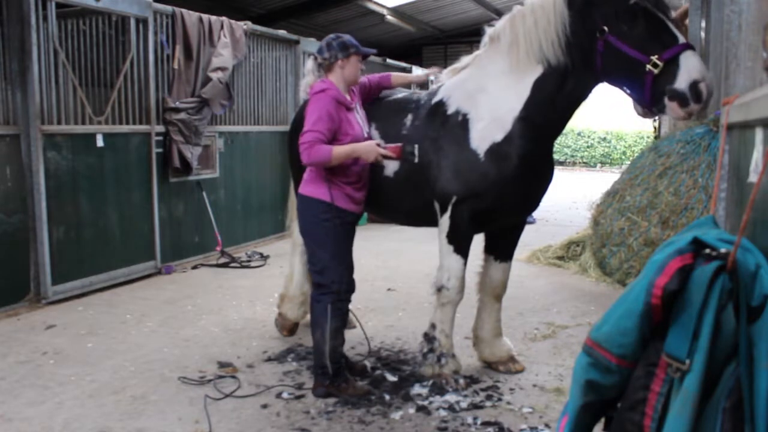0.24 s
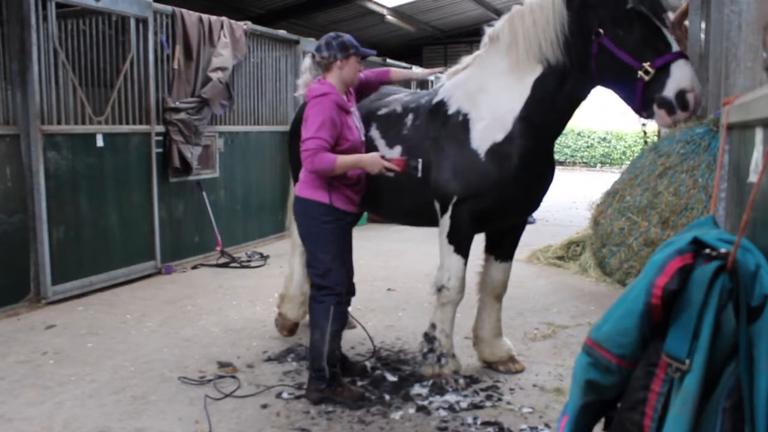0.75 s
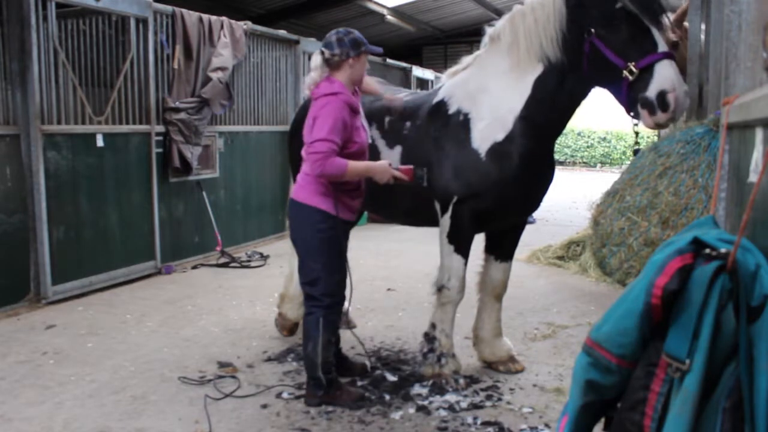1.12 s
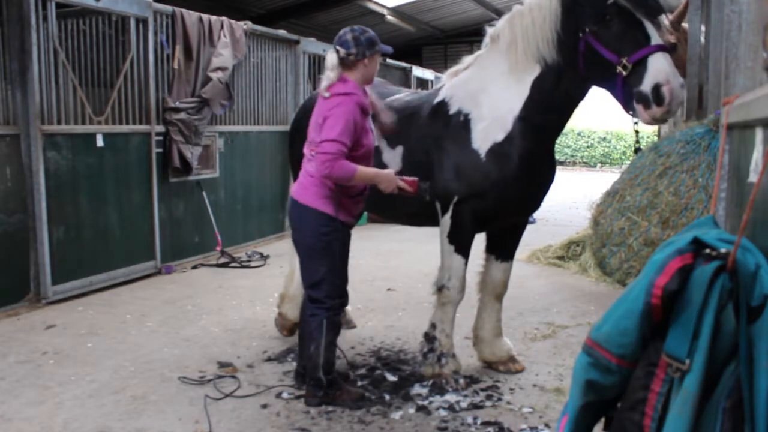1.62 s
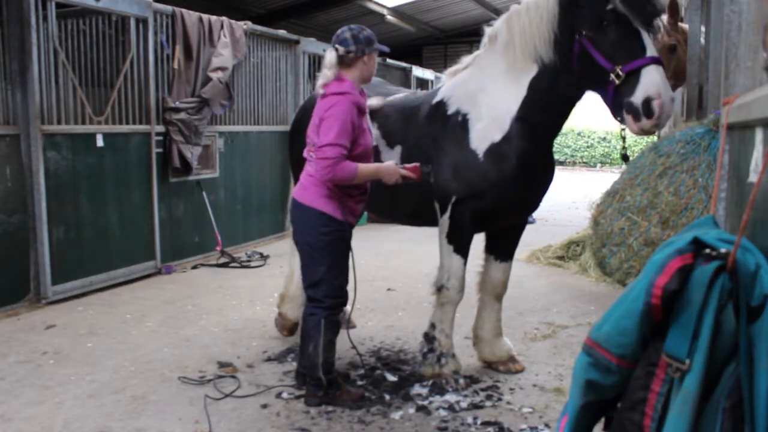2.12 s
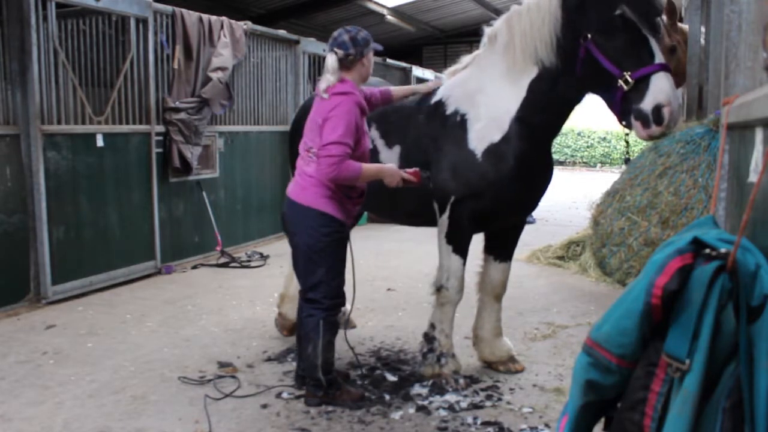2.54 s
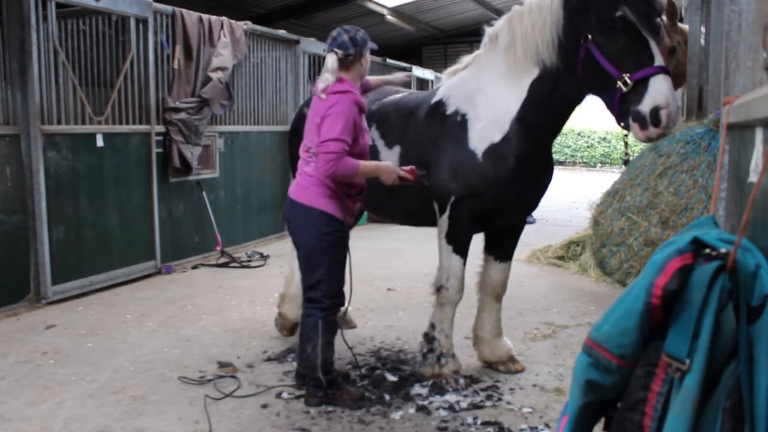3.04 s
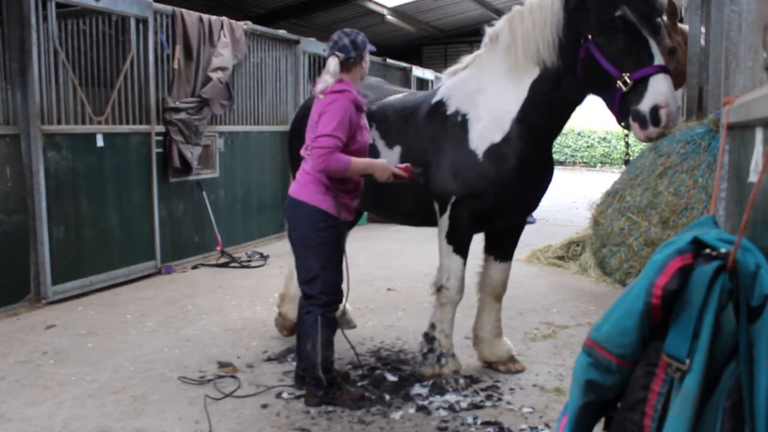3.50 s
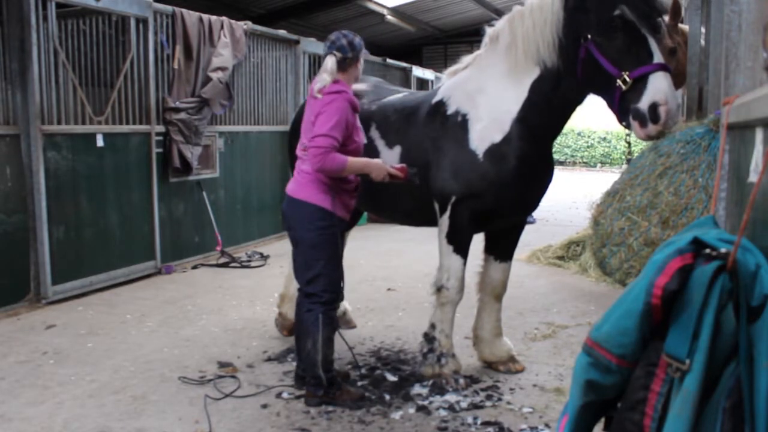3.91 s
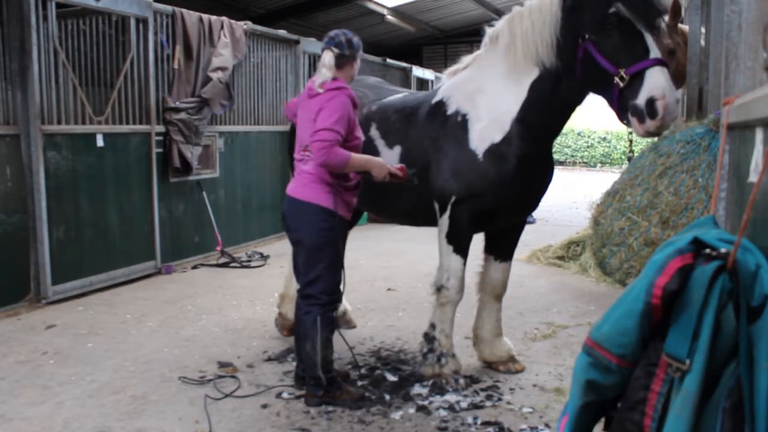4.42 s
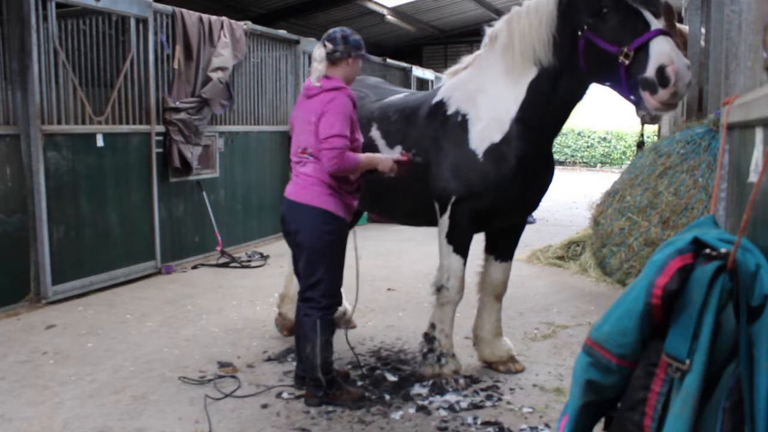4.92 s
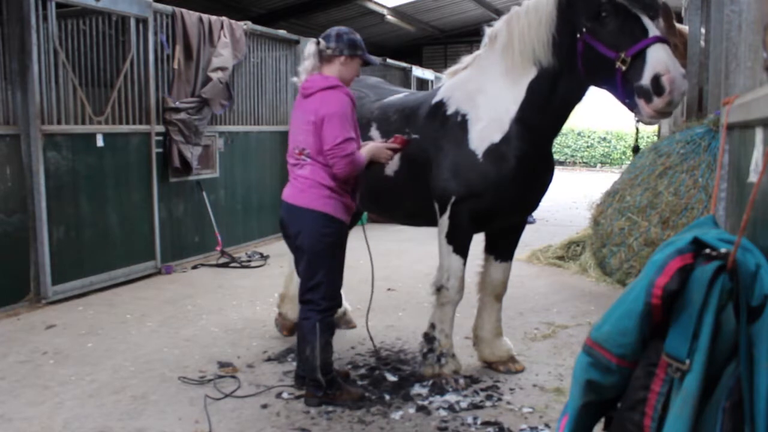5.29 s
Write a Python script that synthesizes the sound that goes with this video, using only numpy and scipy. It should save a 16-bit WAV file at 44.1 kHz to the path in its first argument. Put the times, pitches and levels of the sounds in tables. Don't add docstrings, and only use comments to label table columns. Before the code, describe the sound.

A steady, bright clipper buzz with chattering steel teeth and a thin motor whine wavers slightly as the hand turns in a stable.

```python
import sys
import numpy as np
from scipy import signal
from scipy.io import wavfile
from scipy.ndimage import uniform_filter1d, minimum_filter1d

SR = 44100
rng = np.random.default_rng(int(sys.argv[2]) if len(sys.argv) > 2 else 0)


def dump_mix(stems):
    frames = np.atleast_2d(stems).T
    limited = np.clip(frames, -1, 1)
    pcm = np.round(limited * 32767).astype(np.int16)
    wavfile.write(sys.argv[1], SR, pcm)


def invert_db(level):
    return 10 ** (np.asarray(level, dtype=float) / 20)


N = 244742
TIME = np.arange(N) / SR

# start_s, level_db
LEVEL = [(0.0, -26.5), (0.31, -21.5), (0.91, -22), (1.07, -24), (1.17, -20), (1.39, -22), (2.26, -22),
         (2.32, -24), (2.72, -21.5), (2.87, -22.5), (3.72, -21.5), (3.92, -23), (4.31, -20.5),
         (4.33, -23.5), (4.62, -20), (4.7, -21.5), (5.38, -22.5), (5.55, -26.5)]


def evened(x):
    return x / np.sqrt(np.mean(x ** 2) + 1e-20)


def curves(rows):
    s, *columns = np.transpose(rows)
    return [np.interp(TIME, s, column) for column in columns]


def read(points, hz):
    table_hz, value = np.transpose(points)
    return np.interp(np.log(hz + 1), np.log(table_hz + 1), value)


def coloured(x, points):
    hz = np.abs(np.fft.fftfreq(4096, 1 / SR))
    log_gain = np.log(invert_db(read(points, hz)))
    spectrum = np.exp(np.conj(signal.hilbert(log_gain)))
    taps = np.fft.ifft(spectrum).real[:2048]
    return signal.oaconvolve(x, taps)[:N]


def resonate(x, hz, width_hz):
    return signal.lfilter(*signal.iirpeak(hz, hz / width_hz, SR), x)


def band(x, lo_hz, hi_hz):
    sos = signal.butter(2, [lo_hz, hi_hz], "band", fs=SR, output="sos")
    return signal.sosfiltfilt(sos, x)


def drift(shape, size):
    if shape == N:
        coarse = N // 16 + 2
        return np.interp(np.arange(N) / 16, np.arange(coarse), drift(coarse, size // 16))
    once = uniform_filter1d(rng.standard_normal(shape), size, 0)
    return evened(uniform_filter1d(once, size, 0))


def bump(s, length_s):
    return .5 ** (((TIME - s) / (length_s / 2)) ** 2)


def posed(values):
    # start_s, pose
    pose_times = [
        (0, 0),
        (.95, 0.16),
        (1.25, 0.94),
        (3.4, 1.26),
        (4.55, 1.5),
        (5.05, 2.4),
        (5.55, 1.7),
    ]
    return np.interp(curves(pose_times)[0], range(3), values)


def facing():
    # start_s (the middle), length_s, plate_db, comb_plate_db, top_db
    wrist_turns = [(0.017, 0.067, 10.5, -0.5, 3), (0.527, 0.48, 1, -2.5, -0.5), (1.007, 0.27, 6, -1, 1),
                   (1.552, 0.21, 3, -3.5, 0), (2.455, .25, -.5, 2.5, 0), (3.007, 0.091, -1, 0, -2),
                   (3.184, 0.19, 1, -0.5, 0), (3.647, 0.24, 0.5, 0, -1.5), (4.596, 0.79, 2, -3, -2),
                   (4.925, 0.13, 2, 1, 0.5), (5.55, 0.097, 6, 2.5, 3.5)]
    # low_db, flank_db, raised_db
    top_pose = (0, -0.4, 1.9)
    # low_db, flank_db, raised_db
    comb_pose = (1.4, -.6, -.4)
    plate_db, comb_db, top_db = sum(np.outer(db, bump(s, length_s)) for s, length_s, *db in wrist_turns)
    return curves(LEVEL)[0], plate_db, top_db + posed(top_pose), comb_db + posed(comb_pose)


def crank():
    start_turns, warm_hz, gap_hz, warm_up_s = -0.2003, 38.7381, 0.184, 2.0
    lag_turns = gap_hz * warm_up_s * (1 - np.exp(-TIME / warm_up_s))
    return start_turns + warm_hz * TIME - lag_turns


def brush_whistle():
    # start_s (the middle), length_s, level_db
    vent_swings = [(0.113, .1, -36), (0.448, .15, -36), (.78, 0.38, -34.5), (1.09, .1, -36),
                   (1.28, .12, -39), (1.8, 0.11, -34), (2.0, .1, -46), (2.21, 0.16, -37),
                   (3.018, .3, -31.5), (3.31, 0.083, -38), (3.613, 0.16, -50), (4.02, .15, -51),
                   (4.3, .12, -43), (4.603, .2, -42), (4.86, 0.21, -39), (5.17, .25, -37),
                   (5.512, .08, -36)]
    faint = invert_db(-46)
    swings = sum(invert_db(db) * bump(s, length_s) for s, length_s, db in vent_swings)
    return (faint + swings) * invert_db(1.5 * drift(N, size=400))


def motor():
    # low_db, flank_db, raised_db
    shaft_pose = (-47.5, -56, -50)
    # pitch_per_shaft_turn, level_db
    further_tones = [(.947, -62), (1.895, -57), (2, -54), (3, -50), (9, -44), (12, -44)]
    gear = 11.177
    turn = 2 * np.pi * gear * crank()
    out = invert_db(posed(shaft_pose)) * np.sin(turn)
    out += brush_whistle() * np.sin(18 * turn + .3 * drift(N, size=900))
    for order, db in further_tones:
        level = invert_db(db + 0.5 + 1.0 * drift(N, size=5000))
        out += level * np.sin(order * turn + 1.5 * drift(N, size=4000))
    return np.sqrt(2) * out


def stroke(angle, depth_db, sharp):
    return invert_db(depth_db * (abs(np.cos(2 * np.pi * angle)) ** sharp - 1))


def clicks(angles, sizes, jitter_s, wander_s):
    turns = np.arange(-2, len(sizes) - 2)[:, None]
    s = np.interp(turns + angles, crank(), TIME, left=-1, right=-1)
    s = s + jitter_s * rng.standard_normal(sizes.shape) + wander_s * drift(sizes.shape, size=20)
    at = np.round(s * SR).astype(int)
    inside = (at >= 0) & (at < N)
    return np.bincount(at[inside], sizes[inside], N)


def knocks(count=220):
    # angle_turns, level_db
    turn_knocks = [(.396, -15), (.449, -5), (.488, 0), (.499, -3), (.512, -7), (.537, -6), (.602, -15),
                   (.872, -16), (.896, -14), (.951, -12), (.989, -2), (1.002, -5), (1.026, -6), (1.05, -11)]
    angle, db = np.transpose(turn_knocks)
    shape = (count, len(db))
    chance_db = 2.0 * drift(shape, size=12) + 2.0 * rng.standard_normal(shape)
    size = invert_db(db + np.minimum(chance_db, 4.5))
    push = np.where(angle > .7, -1, 1)
    return evened(clicks(angle, size * push, jitter_s=2.5e-5, wander_s=6e-5))


def chatter(count=220, order=150):
    half = (np.arange(order) + rng.random(order)) / order / 2
    angle = np.r_[half, half + .5]
    pattern = 0.23 * rng.standard_normal(order) + 0.71 * drift((count, order), size=10)
    size = np.c_[pattern, -pattern] + 0.69 * drift((count, 2 * order), size=8)
    size = size * stroke(angle, depth_db=9.3, sharp=1.8)
    return evened(clicks(angle, size, jitter_s=2.2e-5, wander_s=3e-5))


def scrape():
    swell = stroke(crank() + 0.0028, depth_db=6.3, sharp=1.0)
    flare = stroke(crank() - .004, depth_db=3.6, sharp=5.2)
    return evened(rng.standard_normal(N) * swell * flare * invert_db(0.83 * drift(N, size=150)))


def aisle(x, count=3):
    # pitch_hz, fade_s
    echo_fade = [
        (300, 0.99),
        (1000, 0.75),
        (3000, 1),
        (8000, 0.037),
    ]
    out = np.zeros(N)
    for k in range(count):
        taps = np.zeros(SR // 2)
        at = np.arange(200, len(taps) - 20, 20)
        taps[at + rng.integers(0, 20, len(at))] = rng.choice([-1., 1.], len(at))
        hz, t, z = signal.stft(taps, SR, nperseg=256)
        fade = invert_db(-60 * t / read(echo_fade, hz)[:, None])
        tail = signal.istft(z * fade, SR, nperseg=256)[1]
        share = np.sqrt(2 / count) * np.cos(np.pi * (0.49 * TIME + k / count))
        out += signal.fftconvolve(x * share, tail / np.linalg.norm(tail))[:N]
    return out


def blade():
    # pitch_hz, level_db
    knock_colour = [(150, -89), (500, -55), (950, -34), (1200, -20.5), (1800, -11.5), (2200, -6.5),
                    (2600, -7), (3300, -8.5), (4400, -3), (5200, -2.5), (6000, -1.5), (8500, -11.5),
                    (11000, -27.5), (16000, -83.5)]
    # pitch_hz, level_db
    scrape_colour = [(150, -38), (300, -28.5), (600, -14.5), (1200, -9.5), (2150, -7), (2600, -8.5),
                     (3000, -1.5), (4600, -5.5), (6200, -10.5), (8000, -4.5), (10000, -34), (12500, -28.5),
                     (14800, -44), (16000, -77)]
    # pitch_hz, width_hz, level_db
    plate_rings = [
        (2534, 100, 3.5),
        (3256, 82, -4.5),
        (4390, 180, -11),
        (5730, 75, -14),
        (9240, 82, -2.5),
    ]
    hits = evened(coloured(invert_db(-1.5) * knocks() + invert_db(2.5) * chatter(), knock_colour))
    sliding = evened(coloured(scrape(), scrape_colour))
    drive = invert_db(4.5) * hits + invert_db(-1.0) * sliding
    rung = drive.copy()
    for hz, width_hz, db in plate_rings:
        rung += invert_db(db + 1.1 * drift(N, size=6000)) * resonate(drive, hz, width_hz)
    heard = rung + invert_db(-12.0) * aisle(rung)
    level_db, plate_db, top_db, comb_db = facing()
    out = heard / band(heard, 2730, 7070).std()
    for db, lo_hz, hi_hz in ((plate_db, 2250, 2950), (top_db, 6500, 14000), (comb_db, 3100, 3600)):
        out = out + band(out, lo_hz, hi_hz) * (invert_db(db - db.mean()) - 1)
    return invert_db(level_db - 0.6) * out


def hum():
    # pitch_per_crank_turn, low_db,
    # flank_db, raised_db
    crank_tones = [(7, -61, -66, -69), (8, -64, -69, -69), (9, -58, -61, -64), (10, -62, -59, -58),
                   (11, -58, -63, -57), (12, -66, -60, -62), (13, -56, -58, -50), (14, -54, -53, -60),
                   (15, -57, -47, -51), (16, -56, -52, -50), (17, -44, -44, -48), (18, -58, -55, -52),
                   (19, -43, -49, -48), (20, -51, -55, -55), (21, -46, -55, -46), (22, -49, -49, -52),
                   (23, -43, -50, -48), (24, -51, -47, -49), (25, -44, -54, -55), (26, -52, -53, -59),
                   (27, -55, -62, -54), (28, -53, -52, -61), (29, -53, -55, -62), (30, -45, -48, -51),
                   (31, -52, -58, -54), (32, -49, -52, -51), (34, -54, -51, -49), (45, -48, -43, -43),
                   (53, -44, -44, -52),
                   (35, -56, -56, -59), (36, -56, -50, -51), (37, -48, -52, -53), (38, -46, -58, -48),
                   (39, -49, -48, -48), (43, -43, -50, -46), (47, -50, -54, -48), (48, -45, -49, -49),
                   (49, -41, -47, -49), (51, -47, -47, -47), (55, -42, -50, -51), (57, -41, -50, -44),
                   (60, -40, -42, -41), (61, -42, -47, -45), (63, -40, -45, -40), (65, -41, -40, -39),
                   (67, -36, -36, -37), (69, -37, -35, -40), (71, -37, -41, -40), (73, -44, -41, -41),
                   (85, -39, -43, -46), (87, -38, -41, -43), (89, -38, -45, -44)]
    out, angle = np.zeros(N), crank()
    blade_db, plate_db = facing()[:2]
    facing_db = blade_db + plate_db
    swing_db = 0.24 * (facing_db - np.mean(facing_db)) - 0.5
    for order, *db in crank_tones:
        plate = order > 54
        level_db = posed(db) + 1.13 * drift(N, size=5000)
        start = .15 * rng.random() - order * .535 if plate else rng.random()
        phase = 2 * np.pi * (order * angle + start) + 0.39 * drift(N, size=6000)
        out += invert_db(level_db + plate * swing_db) * np.sin(phase)
    return invert_db(2.5) * out


def snap(count=220):
    # pitch_hz, level_db
    tick_colour = [(150, -80), (5000, -27), (8500, -9), (10500, 0), (13000, -8), (16000, -22)]
    size = invert_db(3.0 * np.minimum(rng.exponential(1, (count, 2)), 3))
    ticks = clicks(np.array([.493, .993]), size, jitter_s=0.00015, wander_s=1e-4)
    return invert_db(curves(LEVEL)[0] - 35) * evened(coloured(ticks, tick_colour))


def stable_air():
    # pitch_hz, level_db
    air_colour = [(15, -21), (25, -27), (59, -11.5), (107, -4.5), (221, -4.5), (296, -4.5), (330, -14),
                  (430, -18), (730, -120)]
    air = evened(coloured(rng.standard_normal(N), air_colour))
    far_hum = evened(resonate(rng.standard_normal(N), 63, 2.5))
    out = invert_db(-65 + 2.0 * drift(N, size=2500)) * air
    return out + invert_db(-73 + 2.0 * drift(N, size=9000)) * far_hum


def hooves():
    # start_s, level_db (peak), pitch_hz, fade_s (to fall 60 dB)
    hoof_shifts = [(0.052, -53, 120, 0.13), (.74, -69, 120, .15), (.97, -55, 100, 0.11),
                   (1.5, -51, 120, 0.2), (1.92, -48, 250, 0.12), (2.5, -49, 120, 0.1),
                   (3.38, -49, 230, 0.24), (4.22, -55, 111, 0.42), (4.578, -46, 225, 0.074),
                   (4.64, -32.5, 750, 0.48), (4.69, -49, 70, 0.12)]
    out = np.zeros(N)
    for s, db, hz, fade_s in hoof_shifts:
        age = np.maximum(TIME - s, 0)
        thud = evened(resonate(rng.standard_normal(N), hz, 0.59 * hz))
        soft_start = np.minimum(age / 0.013, 1)
        out += invert_db(db - 60 * age / fade_s) * soft_start * thud
    return out


def scene():
    return (motor() + blade() + hum() + snap() + stable_air() + hooves())[None]


def roll_off(x):
    return signal.sosfilt(signal.butter(12, 15710, fs=SR, output="sos"), x)


def record(dry):
    # start_s, cut_db, recovery_s
    gain_cuts = [
        (.69, 0, 0.12),
        (2.565, 2.5, 0.029),
        (2.74, 1, 0.28),
        (2.87, 1.5, 0.2),
        (3.875, 4, 0.1),
        (4.085, 2, 0.34),
        (4.315, 1.5, 0.067),
    ]
    cut_db = sum(db * np.exp(-np.maximum(TIME - s, 0) / back_s) * (TIME > s) for s, db, back_s in gain_cuts)
    ducked = dry * invert_db(0.47 - uniform_filter1d(cut_db, size=90))
    room_left = minimum_filter1d(np.minimum(.74 / (np.abs(ducked) + 1e-9), 1), size=80)
    limited = ducked * uniform_filter1d(uniform_filter1d(room_left, size=40), size=40)
    edge = signal.firwin(255, 15230, fs=SR)[None]
    return roll_off(signal.oaconvolve(limited, edge, "same"))


dry = scene()
out = record(dry)
dump_mix(out)
```